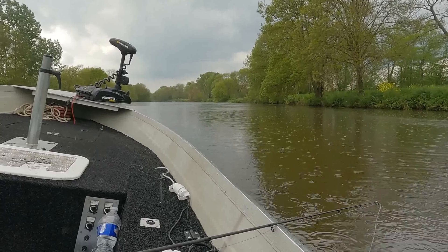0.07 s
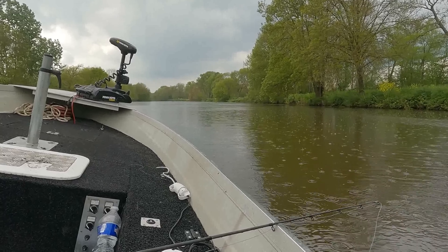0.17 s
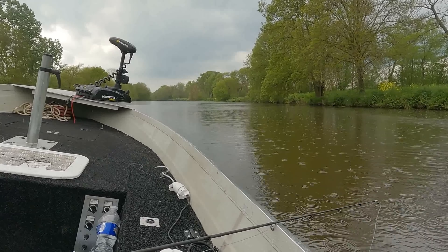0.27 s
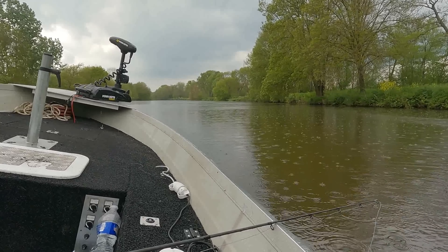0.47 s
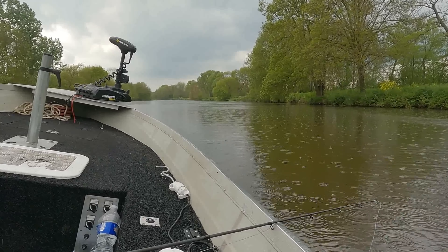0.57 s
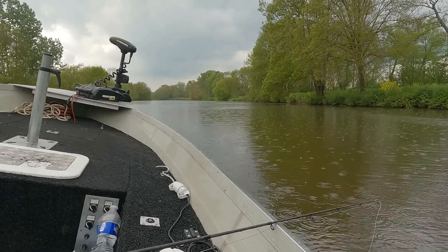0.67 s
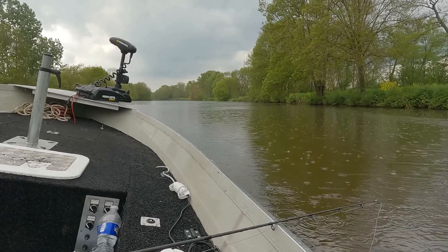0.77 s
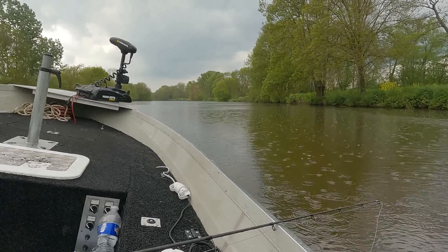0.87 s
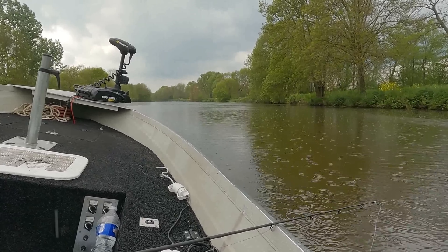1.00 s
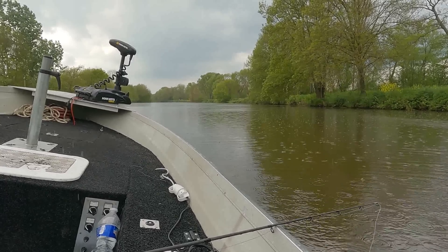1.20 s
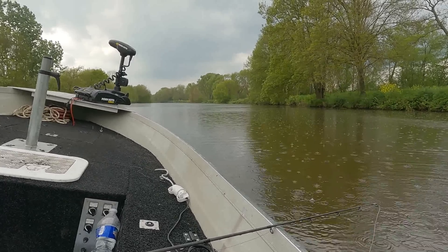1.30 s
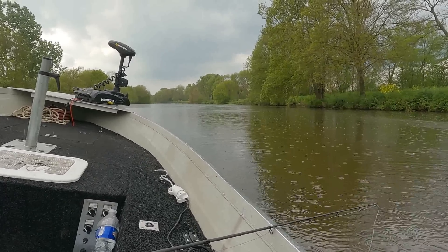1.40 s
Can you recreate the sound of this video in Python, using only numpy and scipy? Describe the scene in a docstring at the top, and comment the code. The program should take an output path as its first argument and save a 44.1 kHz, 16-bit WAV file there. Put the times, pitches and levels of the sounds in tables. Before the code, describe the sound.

Close by on a calm river, something hits the water with a quick low plop, then again, each followed by soft gurgling. Faint raindrops tick around the boat throughout, with a barely audible bird far away.

```python
"""Two plops beside a boat on a calm river in light rain. Each time something slaps the surface, shoves
the water aside and leaves an air pocket that rings with a rising pitch. The pocket breaks into bubbles
and gurgles, and the spray patters back. Raindrops tick on boat and water; a far bird repeats a thin note.
"""
import sys
import numpy as np
from scipy.fft import rfft, irfft, next_fast_len
from scipy.io import wavfile
from scipy.ndimage import map_coordinates

SR = 44100
rng = np.random.default_rng(int(sys.argv[2]) if len(sys.argv) > 2 else 0)


def store_wav(level_fs):
    """Save 16-bit WAV to argv[1]."""
    pcm = np.round(np.clip(np.atleast_2d(level_fs), -1, 1) * 32767)
    wavfile.write(sys.argv[1], SR, pcm.T.astype(np.int16))


N = 63945


def air_pockets():
    """Trapped air rings upward as it shrinks, flutters more and more, and bursts at the surface."""
    # start_s, level_db, pitch_hz, rise_hz_per_s, fade_s (time to fall 60 dB), linger_db, burst_after_s
    pockets = [(0.2196, 5, 226, 9990, 0.054, -24.5, 0.044),
               (0.9415, 10.5, 225.4, 7580, 0.015, -13.5, 0.058)]
    attack_s, linger_fade_s, flutter_db = 0.004, 0.076, 3.5
    echo_s, echo_gain = 0.003, 0.31
    out = np.zeros(N)
    for start, db, hz, rise, fade_s, linger_db, burst_s in pockets:
        progress = np.clip(since(start) / burst_s, 0, 1)
        flutter = amp(flutter_db * progress ** 2 * wobble(per_s=220))
        for delay, gain in ((0, -1), (echo_s, echo_gain)):  # the hull sends back a flipped copy
            t = np.maximum(since(start + delay), 0)
            attack = 1 - np.exp(-(t / attack_s) ** 2)
            fade = amp(-60 * t / fade_s) + amp(linger_db - 60 * t / linger_fade_s)
            cutoff = np.exp(-(t / burst_s) ** 6)
            out += gain * amp(db) * attack * fade * flutter * cutoff * bubble_tone(t, hz, rise)
    return out * pan(-1.55)


def shoves():
    """Water pushed aside makes a short, low swell of sound."""
    # peak_s, level_db, pitch_hz, rise_hz_per_s, swell_s
    swells = [(0.2192, -8, 164, 1174, 0.0069), (.943, -16, 170, 760, 0.0077)]
    return sum(amp(db) * np.exp(-abs(since(peak)) / swell_s) * glide(since(peak), hz, rise)
               for peak, db, hz, rise, swell_s in swells)


def slaps():
    """The surface tears with a bright crack, a brief hollow ring, a soft thud and a short wet tail."""
    # peak_s, level_db, attack_s, fade_s, thud_db, ring_db (ring is then halved), ring_hz
    hits = [(0.213, -22, 0.00067, 0.023, -9, -13.5, 1140), (0.94, -25.5, 0.0049, 0.0064, -27.5, -43, 940)]
    # tone colour of each slap: frequency_hz, level_db
    colours = [
        [(290, -22), (500, -4.5), (866, -10), (1180, -6.5), (1800, -14.5), (2390, -7.5), (2670, -18),
         (4500, -12), (6400, -20), (14500, -50.5)],
        [(550, -7.5), (950, -4), (1250, -10), (1960, -3.5), (2600, -10.5), (3000, -17.5), (3450, -7.5),
         (4100, -12), (5450, -13), (6780, -22.5), (14500, -43)],
    ]
    tail_db, tail_attack_s, tail_fade_s = -9, 0.005, 0.11
    ring_peak_s, thud_s = 0.0009, 0.0007
    out = np.zeros((2, N))
    for (peak, db, attack_s, fade_s, thud_db, ring_db, ring_hz), colour in zip(hits, colours):
        t = since(peak)
        after, before = np.maximum(t, 0), np.minimum(t, 0)
        crack = np.exp(before / attack_s) * amp(-60 * after / fade_s)
        tail = np.exp(before / tail_attack_s) * amp(tail_db - 60 * after / tail_fade_s)
        ring_shape = after / ring_peak_s * np.exp(1 - after / ring_peak_s)
        ring = amp(ring_db) * ring_shape * np.sin(2 * np.pi * ring_hz * t) / 2
        hiss = noise(colour, likeness=[(1000, 0.94), (2200, 0.2), (5000, 1.0)])
        out += (ring + amp(db) * (crack + tail) * hiss) * pan(-3)
        out -= amp(thud_db) * np.exp(-(t / thud_s) ** 2)
    return out


def single_bubbles():
    """Pieces of the pocket blub and falling spray plinks; smaller bubbles climb and die faster."""
    # start_s, level_db, pitch_hz
    blubs = [(.244, -25, 262.5), (.271, -35.5, 878), (0.389, -39.5, 283), (0.433, -42.5, 840),
             (.449, -38.5, 1576), (0.456, -41, 347), (0.458, -41, 914), (.470, -38.5, 949),
             (0.4875, -39.5, 2780), (.488, -36.5, 4450), (0.512, -38, 406), (.551, -39, 264),
             (.668, -42, 182), (.669, -49, 372), (.9415, -31, 941), (1.109, -38.5, 246), (1.135, -38, 956),
             (1.172, -42, 830), (1.199, -40, 1465), (1.219, -39, 1280), (1.236, -41, 1446)]
    base_hz, fade_s, rise_hz_per_s = 300, 0.087, 4100  # fade and rise of a bubble at base_hz
    out = np.zeros(N)
    for start, db, hz in blubs:
        t = np.maximum(since(start), 0)
        pace = np.sqrt(hz / base_hz)
        attack = 1 - np.exp(-(t * hz) ** 2)
        out += amp(db - 60 * t * pace / fade_s) * attack * bubble_tone(t, hz, rise_hz_per_s * pace)
    return out


def gurgles_and_spray():
    """The pocket breaks into low gurgles; thrown spray lands as small bubbles and fizz."""
    # bubble clouds, both tables: start_s, length_s, level_db, pitch_hz
    gurgles = [(0.249, .15, -43, 182.5), (0.968, .16, -47.5, 228)]
    spray = [(.41, 0.03, -49, 1850), (.455, 0.05, -53, 1087), (.515, .065, -53.5, 937),
             (.79, 0.043, -55.5, 1300), (0.98, 0.15, -52.5, 1102), (1.16, 0.1, -49, 1404)]
    out = np.zeros((2, N))
    for start, length, db, hz in gurgles:
        out += amp(db) * bubble_cloud(start, length, per_s=330, hz=hz, spread=0.34,
                                      cycles=16.2, rise=1.0, scatter_db=0.5, width_db=-0.5)
    for start, length, db, hz in spray:
        patter = bubble_cloud(start, length, per_s=650, hz=hz, spread=0.247,
                              cycles=25.3, rise=0.31, scatter_db=6.5, width_db=3.5)
        fizz = bubble_cloud(start, length, per_s=760, hz=4490, spread=0.3,
                            cycles=17, rise=0.3, scatter_db=9, width_db=0.5)
        out += amp(db) * patter + amp(db - 6) * fizz
    return out * pan(-2)


def churn():
    """The water stays unsettled for a moment after each plop, then calms."""
    # start_s, length_s, level_db
    stirs = [(0.228, 0.2, -47), (0.936, 0.13, -48)]
    # low rumble: frequency_hz, level_db
    colour = [(25, -16.5), (70, -6.5), (350, -10.5), (600, -20.5), (1500, -24), (5000, -63.5)]
    calm_s = 0.025
    level = sum(amp(db) * (since(start) > 0) * np.exp(-np.maximum(since(start + length), 0) / calm_s)
                for start, length, db in stirs)
    return level * noise(colour, likeness=[(60, 0.95), (250, 0.9)])


def near_drops():
    """Each close raindrop lands with a click and a short, noisy ring."""
    # start_s, level_db, pitch_hz, fade_s, click_db (compared with the ring), left_minus_right_db
    drops = [(0.0925, -36.5, 1200, 0.016, -15, -2), (.1604, -33, 1340, 0.0094, -6, -1),
             (0.447, -41.5, 5350, 0.031, -3, -3.5), (0.568, -47, 4100, 0.027, -32, -7),
             (.639, -47, 2100, 0.025, -4, 0), (.767, -43.5, 1185, 0.016, -14.5, 16),
             (.888, -43, 1490, 0.019, -5, -3.5), (1.084, -25, 1930, 0.007, -13, 7),
             (1.1056, -30.5, 1180, 0.022, 9.5, 2), (1.206, -40.5, 4680, 0.032, -11, -5.5),
             (1.2799, -34, 1310, 0.026, -14, -1.5), (1.355, -35, 2160, 0.0099, -3, 1),
             (1.373, -39.5, 1320, 0.036, 0.5, 1.5), (1.423, -36.5, 2280, 0.0041, -0.5, 21.5)]
    # tone colour of the click: frequency_hz, level_db
    colour = [(60, -52), (300, -3), (1200, -2.5), (5500, 0.5), (8000, -12.5), (14000, -43)]
    attack_s, width_octaves, width_at_hz = 0.0004, 0.45, 1400
    click = noise(colour, likeness=[(1000, 0.9)])
    hiss = noise([(1000, 0)], likeness=[(1000, 0.98)])
    out = np.zeros((2, N))
    for start, db, hz, fade_s, click_db, pan_db in drops:
        t = np.maximum(since(start), 0)
        width = width_octaves * np.sqrt(width_at_hz / hz)  # higher drops ring more purely
        ring = unit(filtered(hiss, lambda f: np.exp(-(np.log2((f + 1) / hz) / width) ** 2 / 2)))
        fade = (1 - np.exp(-(t / attack_s) ** 2)) * amp(-60 * t / fade_s)
        level = amp(db) * np.sqrt(np.mean(fade ** 2))
        out += pan(pan_db) * level * unit(fade * (ring + amp(click_db) * click))
    return out


def far_rain():
    """Distant drops blur into a soft wash with tiny ticks on top."""
    # loudness of the wash: time_s, level_db
    levels = [(0, -53), (0.161, -49.5), (0.282, -56.5), (.45, -52.5), (.62, -60), (0.852, -55),
              (1.1, -51.5), (1.31, -52), (1.45, -54)]
    # its tone colour: frequency_hz, level_db
    colour = [(25, -3), (92, -25), (149, -1), (230, 1), (563, -7.5), (1190, -4), (1550, -7.5), (4100, -9.5),
              (6700, -18.5), (14500, -41)]
    # how alike left and right are: frequency_hz, likeness (1 = the same)
    likeness = [(100, 0.42), (300, 0.86), (1000, 0.27), (3000, 0.15), (10000, 1)]
    flutter_db, tick_db = 1.5, -48
    level_db = np.interp(since(0), *np.transpose(levels)) + flutter_db * wobble(per_s=40)
    wash = amp(level_db) * noise(colour, likeness)
    ticks = bubble_cloud(0, N / SR, per_s=350, hz=2580, spread=0.35,
                         cycles=4.8, rise=0.1, scatter_db=7.5, width_db=0)
    return wash + amp(tick_db) * ticks


def bird():
    """A thin, slightly rising whistle, repeated far off in the trees."""
    # start_s, level_db
    notes = [(0.076, -53), (.37, -60.5), (0.668, -61), (0.766, -63), (.99, -61), (1.29, -60)]
    length_s, pitch_hz, rise_hz_per_s, waver_hz = 0.098, 3933, 1000, 36.2
    out = np.zeros(N)
    for start, db in notes:
        t = np.clip(since(start), 0, length_s)
        hz = pitch_hz + rise_hz_per_s * t + waver_hz * wobble(per_s=150)
        swell = np.sqrt(abs(np.sin(np.pi * t / length_s)))
        out += amp(db) * swell * np.sin(2 * np.pi * np.cumsum(hz) / SR)
    return out


def bubble_cloud(start, length, per_s, hz, spread, cycles, rise, scatter_db, width_db):
    """Many fading bubbles, varied in pitch (spread), level (scatter_db) and side (width_db)."""
    out = np.zeros((2, N + SR))
    count = max(int(per_s * length), 1)
    chance = np.random.default_rng(rng.integers(2 ** 31))
    for k, (when, pitch, size, side) in enumerate(chance.standard_normal((count, 4))):
        f = hz * np.exp(spread * np.clip(pitch, -2, 2))
        life = min(cycles / f, 0.5)
        t = np.arange(int(life * SR)) / SR
        fade = (1 - np.exp(-t * f * 2)) * amp(-60 * t / life)
        ring = fade * glide(t, f, rise * f / life)  # rise = 1 doubles the pitch
        at = int(np.clip(start + (k + when / 2) / per_s, 0, N / SR) * SR)
        out[:, at:at + len(t)] += pan(width_db * side) * amp(scatter_db * min(size, 2)) * ring
    return out[:, :N]


def bubble_tone(t, hz, rise, settle_s=0.056):
    """A tone whose pitch climbs quickly, then levels off."""
    extra_cycles = rise * settle_s * (t - settle_s * (1 - np.exp(-t / settle_s)))
    return np.sin(2 * np.pi * (hz * t + extra_cycles))


def glide(t, hz, rise):
    """A tone whose pitch climbs steadily, by rise Hz a second."""
    return np.sin(2 * np.pi * (hz * t + rise * t * t / 2))


def noise(colour, likeness):
    """Stereo noise shaped by (Hz, dB) colour points and (Hz, left-right likeness) points."""
    def response(hz):
        angle = np.arccos(np.clip(along(likeness, hz), -1, 1)) / 2
        return amp(along(colour, hz)) * [np.cos(angle), np.sin(angle)]
    mid, side = filtered(rng.standard_normal((2, N)), response)
    return unit(np.array([mid + side, mid - side]))


def wind_filter(hz, edge_hz=127, cut_db=-8):
    """The microphone's wind filter thins the bass of the plops and bubbles below about 130 Hz."""
    return 1 - (1 - amp(cut_db)) / (1 + (hz / edge_hz) ** 18)


def filtered(x, response):
    """Multiply each frequency in x by response(hz)."""
    size = next_fast_len(N + 8192)
    return irfft(rfft(x, size) * response(np.fft.rfftfreq(size, 1 / SR)), size)[..., :N]


def along(points, hz):
    """Read between (Hz, value) points on a log frequency scale."""
    freqs, values = np.transpose(points)
    return np.interp(np.log(hz + 1), np.log(freqs + 1), values)


def wobble(per_s):
    """A smooth curve through per_s random values a second."""
    return map_coordinates(rng.standard_normal(400), [np.arange(N) * per_s / SR], mode="mirror")


def amp(db):
    """Decibels to gain."""
    return 10 ** (np.asarray(db) / 20)


def unit(x):
    """Scale to an average power of 1."""
    return x / np.sqrt(np.mean(x ** 2) + 1e-20)


def since(s):
    """Seconds from time s, for every sample."""
    return np.arange(N) / SR - s


def pan(db):
    """Left and right gains; the left is db louder, so negative means right."""
    return amp(np.array([[db], [-db]]) / 2)


def scene():
    """The plops, a little to the right, and their bubbles over the rainy river."""
    lag_s = 0.000014  # the plops reach the left side this much later
    delays = np.array([[lag_s], [-lag_s]]) / 2
    plops = filtered(air_pockets() + shoves(), wind_filter) + slaps()
    plops = filtered(plops, lambda hz: np.exp(-2j * np.pi * hz * delays))
    water = plops + churn() + gurgles_and_spray() + filtered(single_bubbles(), wind_filter)
    return water + near_drops() + far_rain() + bird()


def record(dry):
    """Soften the deepest bass and remove the highest treble."""
    low_hz, top_hz = 35, 14600
    return filtered(dry, lambda hz: hz / np.hypot(hz, low_hz) * (hz < top_hz))


dry = scene()
out = record(dry)
store_wav(out)
```